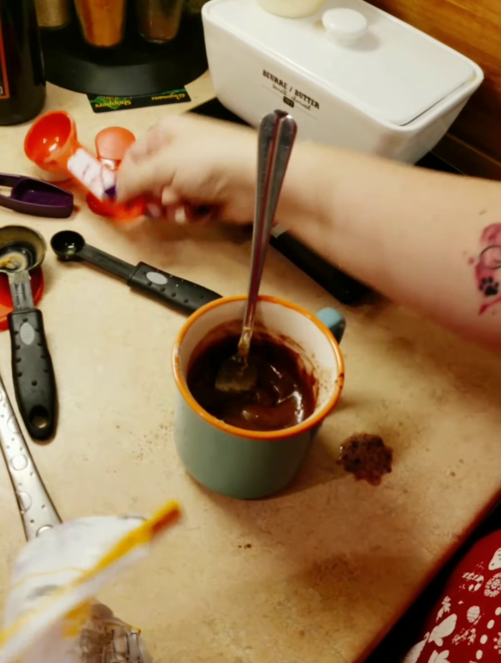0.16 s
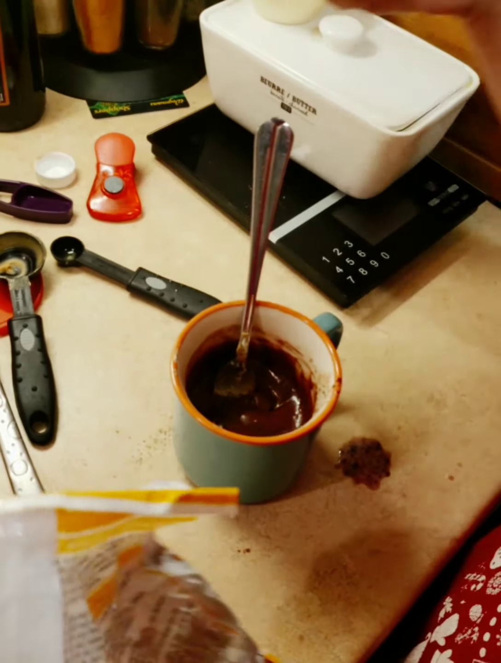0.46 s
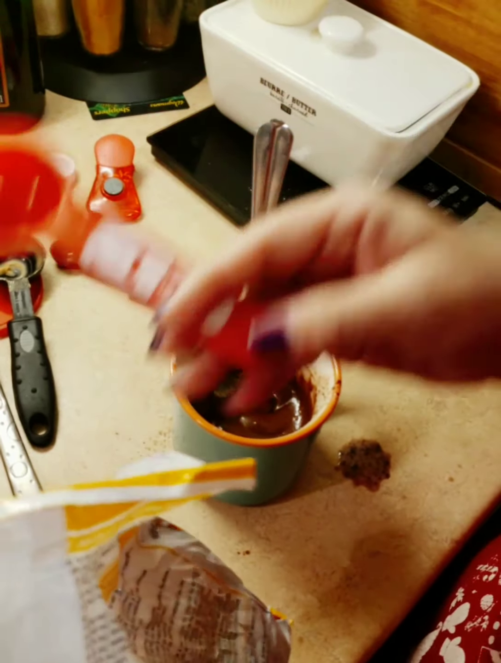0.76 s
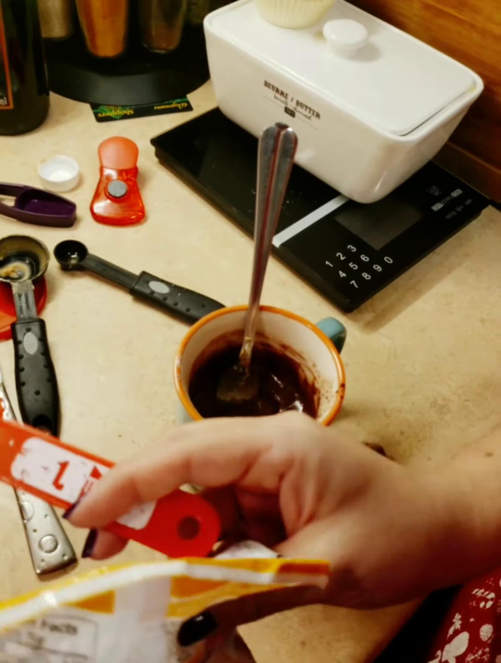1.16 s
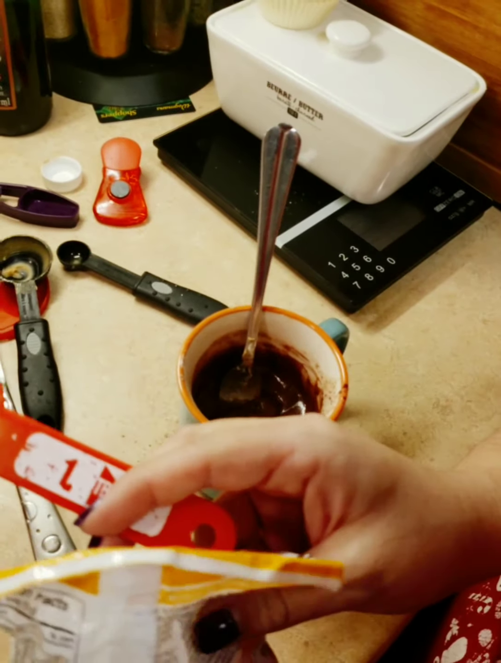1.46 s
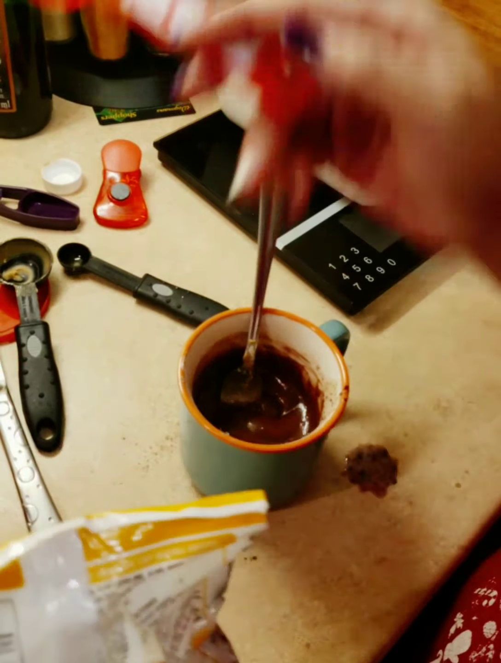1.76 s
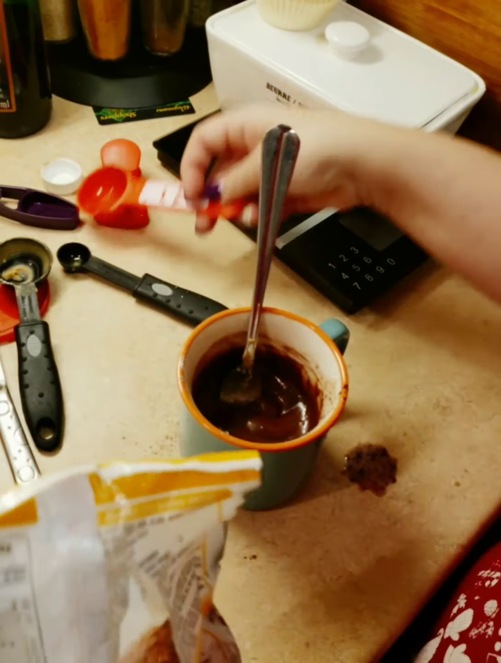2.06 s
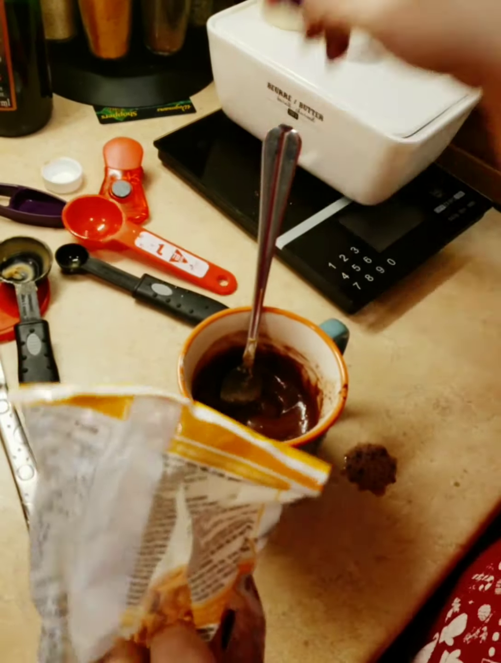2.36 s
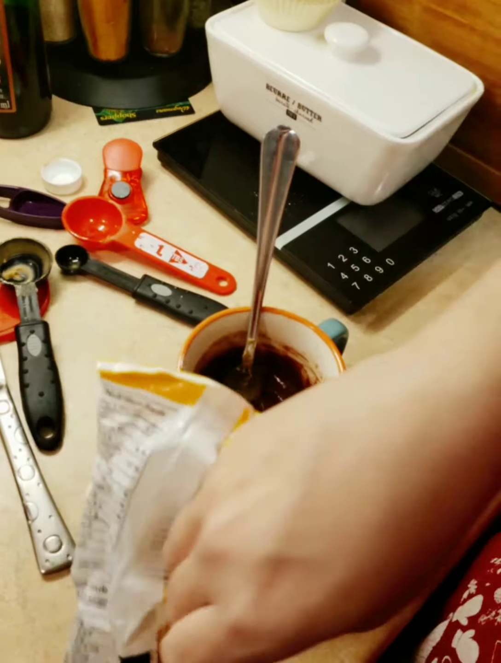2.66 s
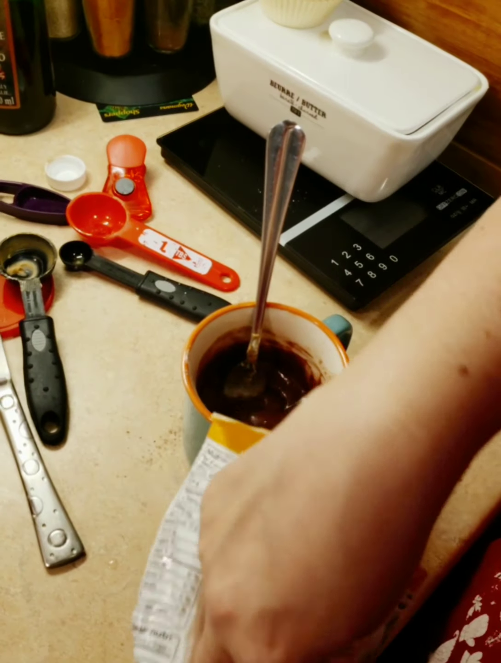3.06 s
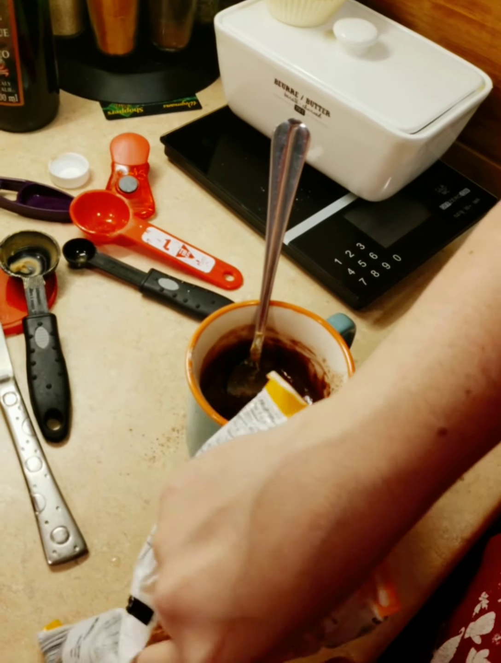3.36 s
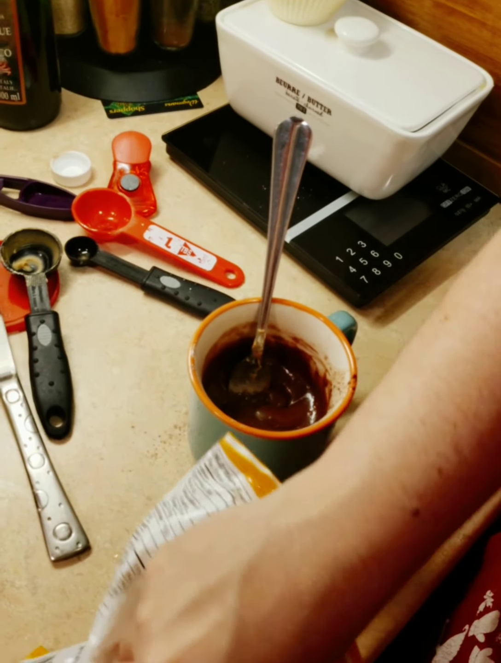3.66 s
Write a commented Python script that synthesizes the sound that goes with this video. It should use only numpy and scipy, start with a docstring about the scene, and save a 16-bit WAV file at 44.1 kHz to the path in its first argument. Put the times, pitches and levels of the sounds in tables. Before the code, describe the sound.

Close by in a quiet kitchen, a plastic bag crackles, lightly at first and then more densely. Just past halfway a plastic spoon lands and bounces on the counter, and louder crumpling of the bag follows.

```python
"""Kitchen counter in a small room, quiet room noise throughout; a plastic bag is handled, 3.8 s.
From the start fingers rub the film and creases buckle, in single snaps and in crumples of many small
ones, thickest from 1.1 s; soft low bumps join in. At 2.25 s a plastic measuring spoon clatters
down, a noise clack plus ringing modes, and slides as a stream of slips. From 2.8 s the bag is squeezed
hard and tipped over a mug. Counter and room answer every sound by convolution with decaying noise."""
import sys
import numpy as np
from scipy import signal
from scipy.io import wavfile

SR = 44100
rng = np.random.default_rng(int(sys.argv[2]) if len(sys.argv) > 2 else 0)


def persist_wave(psi):
    """Save psi, clipped to +-1, as 16-bit WAV."""
    counts = np.round(np.clip(psi, -1, 1) * 32767).astype(np.int16)
    wavfile.write(sys.argv[1], SR, np.atleast_2d(counts).T)


N = 167580  # samples

# Event levels are set ahead of the room and the microphone; spectra are relative.
# Room noise, density over frequency: [f/Hz, level/dB]
ROOM_NOISE_SPECTRUM = [(20, 11), (40, 9.5), (170, 0), (350, -3), (1400, -14.5), (2050, -2), (2800, -5),
                       (5000, -17), (8000, -30), (16000, -25)]
ROOM_NOISE_DB = -56.5  # RMS ahead of the microphone

# Reverberation time of the room tail: [f/Hz, T60/s]
ROOM_T60 = [(100, 0.38), (250, 0.84), (700, 0.5), (2000, .28), (5000, 0.3), (8000, 0.29), (15000, 0.16)]
# Share that the surfaces reflect: [f/Hz, level/dB]
REFLECTED_SPECTRUM = [(100, -3.5), (2500, -0.5), (5000, 2), (8000, -7.5), (16000, 9.5)]
EARLY_DB, EARLY_DECAY_S, TAIL_DB = -9.5, 0.0049, -8

# Response of the microphone: [f/Hz, level/dB]
MIC_RESPONSE = [(30, -17.5), (100, -3), (700, -1.5), (1000, 0), (1600, -3), (2500, -2.5), (3800, -4),
                (6000, 0), (10300, -4.5), (11100, -12), (11900, -4.5), (15400, -8), (16200, -34)]
MIC_EDGE_HZ = 16500

# Strokes of the spoon sliding on the counter: [start t/s, length/s, level/dB]
SCRAPES = [(2.349, 0.035, -25.5), (2.535, .05, -42)]
# Spectrum of that scrape: [f/Hz, level/dB]
SCRAPE_SPECTRUM = [(100, -25), (500, -8), (1100, -9), (1600, 0), (2300, -1), (3200, -4), (3900, -5),
                   (4800, -12), (5500, -17), (6000, -7.5), (6600, -19), (16000, -29)]
# Strokes of fingers over the film: [start t/s, length/s, level/dB]
RUBS = [(0, 0.086, -50), (.2, 0.095, -57.5), (.3, 0.048, -50), (1.01, 0.097, -55.5), (1.93, 0.048, -49.5),
        (2.775, 0.044, -39.5)]
# Spectrum of that rubbing: [f/Hz, level/dB]
RUB_SPECTRUM = [(100, 4), (500, 0.5), (2500, -2), (5000, -12), (8000, -5), (12000, -8), (16000, -13)]
SLIPS_PER_S = 15000  # mean rate

# Soft low bumps of the handled bag, and of the counter under the spoon: [t/s, level/dB, f/Hz, decay/s]
BUMPS = [(0.334, -39, 197, 0.0075), (0.339, -39.5, 522, 0.0078), (1.015, -41.5, 130, 0.019),
         (1.112, -41, 270, 0.0053), (1.142, -37.5, 152, 0.0072), (1.235, -36, 151, 0.011),
         (1.343, -34, 188, .01), (1.371, -29.5, 236, 0.0072), (1.428, -31.5, 486, 0.0026),
         (1.436, -35, 150, .014), (1.579, -36, 157, .01), (1.605, -31, 122, 0.017),
         (1.606, -33, 400, 0.0029), (1.804, -32, 146, 0.0073), (1.828, -37.5, 171, 0.0084),
         (2.057, -37, 222, .016), (2.068, -40.5, 235, 0.013), (2.246, -28.5, 228, 0.019),
         (2.295, -40, 129, 0.012), (2.44, -33, 163, 0.019), (2.809, -46, 125, 0.0099),
         (3.003, -29, 380, 0.0029), (3.239, -34, 376, .008), (3.301, -36, 133, 0.0074),
         (3.487, -33.5, 169, 0.018), (3.655, -32, 229, .018)]
BUMP_NOISE_DB = 0.5  # scuff relative to tone
BLOW_S = 0.01  # bump and knock levels are RMS over this time

# Spoon striking the counter: [t/s, level/dB]
KNOCKS = [(2.2457, -20.5), (2.2535, -33), (2.264, -28.5), (2.276, -23.5), (2.4363, -25), (2.4425, -23.5),
          (2.494, -32.5), (2.549, -33)]
# Ringing modes of the spoon, nominal: [f/Hz, level/dB, T60/s]
SPOON_MODES = [(393, -5.5, 0.11), (524, -8, 0.11), (884, -3, 0.071), (1447, 10, 0.092), (1565, -0.5, 0.2),
               (1860, -4, .1), (2400, 0, 0.1), (2643, 4.5, 0.11), (3015, -5, 0.11), (3370, -18, .08),
               (4080, -10, .08), (4380, -3, 0.099), (4703, -0.5, 0.065)]
# Spectrum of the clack on contact: [f/Hz, level/dB]
CLACK_SPECTRUM = [(60, -24), (200, -10.5), (500, -2), (750, -9), (1000, -7.5), (1500, -4), (3000, -4.5),
                  (4800, -9.5), (6000, -19), (16000, -24)]
CLACK_DECAY_S, SPOON_RING_DB = 0.0072, -2.5  # ring relative to clack
# Each point of impact favours other modes: spread of level, largest relative shift of pitch
STRIKE_SPREAD_DB, STRIKE_DETUNE = 4, 0.028

# Squeezes of the bag, and at 2.485 s a crinkling swarm as the spoon slides: [start t/s, length/s, body
# level/dB, tick level relative to body/dB]
SQUEEZES = [(0.0, 0.014, -40, -20), (0.047, 0.17, -52.5, -19), (0.133, .012, -39, -27),
            (0.328, 0.038, -42.5, -15), (0.385, .22, -54, -19), (0.601, .2, -57.5, -24),
            (0.761, 0.013, -32.5, -12), (0.859, 0.033, -50, -39), (0.793, 0.013, -57, -36),
            (1.008, 0.027, -44, -25), (1.096, 0.052, -33.5, -21), (1.164, 0.1, -36, -12),
            (1.271, 0.16, -45.5, -8.5), (1.323, 0.029, -39.5, -29), (1.42, 0.026, -32.5, -14.5),
            (1.467, .04, -39, -25), (1.574, 0.11, -40, -13), (1.718, .04, -34.5, -19),
            (1.777, 0.08, -36, -19), (1.847, .03, -52, -17), (1.926, .2, -51.5, -12),
            (2.176, 0.015, -31, -31), (2.485, 0.08, -40.5, -4), (2.629, 0.11, -47.5, -16),
            (2.799, .03, -27, -8.5), (2.853, .022, -25.5, -18), (2.87, 0.087, -38.5, -15.5),
            (2.981, .018, -37, -20), (3.005, .028, -26.5, -13.5), (3.042, .15, -31, -12),
            (3.232, 0.066, -29.5, -12.5), (3.303, .056, -25.5, -10), (3.36, 0.093, -32.5, -11),
            (3.454, 0.07, -28, -13), (3.526, .09, -46, -13), (3.615, 0.021, -40, -16),
            (3.637, .055, -27, -16.5), (3.697, .11, -38, -14)]
CREASES_PER_S, DENSITY_REF_DB = 520, -36  # rate for a squeeze at the reference level
DENSITY_DB_PER_DB = 0.43  # harder squeezes buckle more creases
SIZE_SPREAD_DB, TICK_SPREAD_DB = 2.5, 6
GRIP_S = 0.0025  # time constant for a squeeze to build up

# Loud single creases: [t/s, body level/dB, film f/Hz, tick level/dB]
SNAPS = [(0.0473, -33.5, 2300, -34.0), (0.0897, -23, 2610, -39), (0.1075, -46, 2530.0, -39),
         (0.1878, -46, 2680.0, -38.5), (0.3422, -30, 2050, -30), (0.3528, -26, 2350, -32),
         (0.4195, -45, 2200, -50), (0.4717, -25.5, 2810, -38.5), (0.507, -25, 2170, -31.5),
         (0.5404, -32, 2470, -70), (0.5487, -48, 2600, -36.5), (0.5806, -55, 2380, -43.0),
         (0.597, -38.5, 1950, -59), (0.6347, -28.0, 2770, -62), (0.6437, -36, 2020, -44),
         (0.682, -43, 2200, -73), (0.7065, -62, 2930, -69), (0.722, -33, 2800, -37),
         (0.7636, -26.5, 1860, -34.0), (0.8605, -65, 3140, -71), (0.874, -42, 1930.0, -78),
         (0.8915, -54, 2550, -74), (1.0104, -40, 2070, -49), (1.0212, -38, 2140, -58),
         (1.0891, -35, 2470, -47), (1.0986, -23.5, 2300, -26), (1.1111, -23.5, 2650, -32),
         (1.1165, -23.5, 2700, -35), (1.1394, -22.0, 2170, -46), (1.1724, -30, 2430.0, -39),
         (1.1941, -32, 2250, -32), (1.2097, -27.5, 2040, -38), (1.231, -33, 2310, -26.5),
         (1.2455, -28, 2800, -42), (1.2581, -25.5, 2580, -34), (1.3242, -28.5, 2230, -56),
         (1.3433, -29.0, 1980, -50), (1.3699, -24.5, 2530, -38), (1.4453, -25, 2540.0, -45),
         (1.4707, -36, 2200, -46), (1.4875, -27, 2050, -39), (1.5257, -39, 2480, -42),
         (1.5406, -20.5, 2650, -34), (1.5755, -41, 2100, -41), (1.5847, -25, 2430, -50),
         (1.6165, -35, 2410, -32.5), (1.6304, -33, 2130, -35), (1.6602, -37, 2230.0, -40),
         (1.674, -41, 2300, -54), (1.7005, -40, 2400, -45), (1.7234, -28, 2890.0, -30.0),
         (1.7382, -31, 2400, -31), (1.7475, -29.5, 2490, -28), (1.7782, -29, 2250, -41),
         (1.8057, -25.0, 1860, -31.5), (1.8205, -33, 2090.0, -31), (1.8322, -23, 1980, -31.0),
         (1.8411, -38, 1950.0, -29), (1.873, -36, 2500, -52), (1.9863, -33, 1830, -53),
         (2.0213, -32.5, 2660, -37), (2.0434, -32.5, 2130, -45), (2.0904, -32.5, 2500, -33.0),
         (2.1522, -28, 2900, -30), (2.1778, -26, 2410, -39), (2.21, -40, 2500, -37),
         (2.2952, -27, 2340, -37), (2.4408, -19, 1690.0, -24), (2.6365, -39.5, 1730, -45),
         (2.6873, -30.0, 2030, -42), (2.776, -42, 2400, -46), (2.7995, -25, 2120, -49),
         (2.814, -24.5, 2440, -27.5), (2.8234, -18, 2470.0, -40), (2.8522, -23.5, 2130, -37),
         (2.8591, -21, 2080.0, -25.5), (2.928, -50, 2400, -43), (2.9345, -36, 2410, -49),
         (2.9723, -22, 2550, -24), (3.0024, -17, 2360, -23), (3.0038, -19.5, 2140, -31),
         (3.015, -26, 2310.0, -23), (3.0421, -25, 2540.0, -43), (3.0832, -22, 2200, -26),
         (3.1364, -23, 2560, -30), (3.1773, -22, 2300, -31.5), (3.2144, -28, 2650, -32),
         (3.2381, -25.5, 2060, -27.5), (3.2592, -18.0, 2090, -23), (3.2735, -35, 2350.0, -38.0),
         (3.303, -17, 2840, -25), (3.3252, -19.5, 2350, -40), (3.3382, -23, 1850.0, -25.0),
         (3.3809, -22, 2100, -34), (3.4311, -24, 2140, -41), (3.451, -23, 2400, -38.0),
         (3.5066, -37, 2030, -37), (3.5728, -32.5, 1840, -52), (3.5975, -32, 2210, -37),
         (3.6366, -22, 2030, -50), (3.6556, -25, 1900, -37), (3.6642, -18, 2250, -30.5),
         (3.6698, -32, 2250, -24), (3.6826, -25, 2080, -26), (3.7142, -25, 2020, -35),
         (3.7418, -26, 1980.0, -36), (3.7648, -38, 2430, -41), (3.7792, -26, 2500, -32.5)]
SNAP_S = 0.003  # snap levels are RMS over this time
# Small creases that give way after a loud one: level, latest delay, further fall by then, duller tick
AFTER_DB, AFTER_S, AFTER_FALL_DB, AFTER_TICK_DB = -7.5, 0.012, -3.5, -6

# Broad flexing of the sheet around a crease: [f/Hz, level/dB]
FLEX_SPECTRUM = [(60, -35), (200, -12), (320, -11.5), (500, -3.5), (850, -8), (1400, 1.5), (2700, 0),
                 (3600, -5), (5000, -9), (7000, -22.5), (16000, -33)]
# Noise of the sharp tick: [f/Hz, level/dB]
TICK_SPECTRUM = [(500, -4.5), (2500, -7), (4500, -3), (6500, -0.5), (9000, -1.5), (13000, -12),
                 (16000, -16)]
# Instant of buckling, the brightest part of a tick: [f/Hz, level/dB]
CRACK_SPECTRUM = [(500, -26), (3000, -27), (6000, 0), (9000, 0.5), (13000, -1), (16000, -4.5)]
ATTACK_S = 0.00042  # time constant of the rise
FILM_HZ, FILM_SPREAD, FILM_DECAY_S = 2228, 0.23, 0.00053  # spread is of the log pitch
OVERTONE, OVERTONE_DB = 1.527, -10.5  # second film mode: central pitch ratio, level
FLEX_DB, FLEX_DECAY_S = -4, 0.0011
# The stiff fold pings too; its spread of log pitch also serves the overtone
FOLD_HZ, FOLD_SPREAD, FOLD_DB = 6950, 0.281, -7
TICK_DECAY_S = 0.0012  # tick noise and fold ping
CRACK_DB, CRACK_DECAY_S = 0.5, 0.00019


def amp(db):
    """Decibels to gain."""
    return 10 ** (np.asarray(db) / 20)


def read(points, hz):
    """A table's value on a log-frequency axis."""
    f, value = np.transpose(points)
    return np.interp(np.log(hz + 1), np.log(f + 1), value)


def unit(x):
    """Scales each sound to energy 1."""
    return x / np.sqrt(np.sum(x ** 2, -1, keepdims=True) + 1e-20)


def add(mix, s, sound):
    """Mixes a sound in at time s."""
    part = mix[max(round(s * SR), 0):][:len(sound)]
    part += sound[:len(part)]


def colour(x, points, size=2048):
    """Minimum-phase filter: no sound arrives ahead of its cause."""
    log_gain = np.log(amp(read(points, abs(np.fft.fftfreq(size, 1 / SR)))))
    spectrum = np.exp(np.conj(signal.hilbert(log_gain)))
    taps = np.fft.ifft(spectrum).real[:size // 2]
    taps = taps.reshape((1,) * (x.ndim - 1) + (-1,))
    return signal.fftconvolve(x, taps, axes=-1)[..., :x.shape[-1]]


def room_noise():
    """Steady noise with the spectrum of the quiet room."""
    noise = colour(rng.standard_normal(N), ROOM_NOISE_SPECTRUM)
    return amp(ROOM_NOISE_DB) * np.sqrt(N) * unit(noise)


def kitchen(near, size=16384, count=5):
    """Quick counter reflections, then a short tail; the reflection paths change steadily throughout."""
    t, out = np.arange(size) / SR, np.zeros(N)
    place = np.linspace(0, count, N) * 2  # two rounds through the set of paths
    for k in range(count):
        arrivals = rng.standard_normal(size) * (rng.random(size) < 3000 / SR)
        early = unit(arrivals * (t > .002) * np.exp(-t / EARLY_DECAY_S))
        # each frequency band of the tail dies at its own rate
        hz, at, bands = signal.stft(rng.standard_normal(size) * (t > .006), SR, nperseg=256)
        fade = amp(-60 * at / read(ROOM_T60, hz)[:, None])
        tail = unit(signal.istft(bands * fade, SR)[1][:size])
        # crossfade from one path to the next
        distance = abs((place - k + 1) % count - 1)
        share = np.cos(np.pi / 2 * np.minimum(distance, 1))
        response = amp(EARLY_DB) * early + amp(TAIL_DB) * tail
        out += signal.fftconvolve(near * share, response)[:N]
    return colour(out, REFLECTED_SPECTRUM)


def slides(strokes, spectrum):
    """Friction: a stream of tiny slips that swells and fades with each stroke."""
    out = np.zeros(N)
    for start, length, db in strokes:
        n = int(length * SR)
        slips = rng.standard_normal(n) * (rng.random(n) < SLIPS_PER_S / SR)
        slips *= np.sin(np.linspace(0, np.pi, n))
        add(out, start, amp(db) * np.sqrt(n) * unit(colour(slips, spectrum)))
    return out


def bumps(size=6000):
    """Dull, quickly damped bumps of bag and counter: a low tone and a scuff of noise around it."""
    out, t = np.zeros(N), np.arange(size) / SR
    for s, db, hz, decay in BUMPS:
        shape = (1 - np.exp(-t / 0.00038)) * np.exp(-t / decay)
        tone = shape * np.sin(2 * np.pi * hz * t)
        b, a = signal.butter(2, [hz / 2, hz * 2], "band", fs=SR)
        scuff = signal.lfilter(b, a, shape * rng.standard_normal(size))
        bump = unit(unit(tone) + amp(BUMP_NOISE_DB) * unit(scuff))
        add(out, s, amp(db) * np.sqrt(BLOW_S * SR) * bump)
    return out


def ring(modes, t, spread_db, detune):
    """Dying partials of random phase, energy 1; strength and pitch vary from blow to blow."""
    out = np.zeros(len(t))
    for hz, db, t60 in modes:
        level = amp(db + spread_db * rng.standard_normal() - 60 * t / t60)
        pitch = hz * (1 + detune * rng.uniform(-0.96, 1))
        out += level * np.sin(2 * np.pi * (pitch * t + rng.random()))
    return unit(out)


def spoon(size=10000):
    """Bowl and handle of the spoon land and bounce: a clack and a short plastic ring."""
    out, t = np.zeros(N), np.arange(size) / SR
    for s, db in KNOCKS:
        noise = rng.standard_normal(size) * np.exp(-t / CLACK_DECAY_S)
        clack = unit(colour(noise, CLACK_SPECTRUM))
        ringing = ring(SPOON_MODES, t, STRIKE_SPREAD_DB, STRIKE_DETUNE)
        knock = unit(clack + amp(SPOON_RING_DB) * ringing)
        add(out, s, amp(db) * np.sqrt(BLOW_S * SR) * knock)
    return out


def creases(body_db, hz, tick_db, size=400):
    """Each buckling crease gives a sharp tick, a few cycles of the film and a broad flex."""
    t = np.arange(size) / SR
    rise = 1 - np.exp(-t / ATTACK_S)
    spread = np.clip(rng.standard_normal((2, len(hz))), -2, 2)
    overtone_shift, fold_shift = np.exp(FOLD_SPREAD * spread)

    def ping(pitch, decay):
        """A few dying cycles of random phase."""
        cycles = pitch[:, None] * t + rng.random((len(pitch), 1))
        return unit(rise * np.exp(-t / decay) * np.sin(2 * np.pi * cycles))

    def burst(decay, spectrum):
        """A short burst of coloured noise."""
        noise = rng.standard_normal((len(hz), size))
        return unit(colour(noise * rise * np.exp(-t / decay), spectrum))

    film = ping(hz, FILM_DECAY_S)
    film = film + amp(OVERTONE_DB) * ping(hz * OVERTONE * overtone_shift, FILM_DECAY_S)
    body = unit(film + amp(FLEX_DB) * burst(FLEX_DECAY_S, FLEX_SPECTRUM))
    tick = burst(TICK_DECAY_S, TICK_SPECTRUM)
    tick = tick + amp(FOLD_DB) * ping(FOLD_HZ * fold_shift, TICK_DECAY_S)
    tick = unit(tick + amp(CRACK_DB) * burst(CRACK_DECAY_S, CRACK_SPECTRUM))
    return amp(body_db)[:, None] * body + amp(tick_db)[:, None] * tick


def crumple():
    """Each squeeze sets off a swarm of small creases of random size and pitch."""
    out = np.zeros(N)
    for start, length, db, relative_tick_db in SQUEEZES:
        density = CREASES_PER_S * amp(DENSITY_DB_PER_DB * (db - DENSITY_REF_DB))
        count = max(int(length * density), 2)
        size, pitch, edge = np.clip(rng.standard_normal((count, 3)), -2, 2).T
        t = length * (np.arange(count) + rng.uniform(0, 2, count)) / count
        # the swarm shares out the energy of its squeeze
        strength = unit(amp(SIZE_SPREAD_DB * size) * (1 - np.exp(-t / GRIP_S)))
        body_db = db + 20 * np.log10(strength + 1e-9)
        tick_db = body_db + relative_tick_db + TICK_SPREAD_DB * edge
        sounds = creases(body_db, FILM_HZ * np.exp(FILM_SPREAD * pitch), tick_db)
        for s, sound in zip(start + t, sounds):
            add(out, s, sound * np.sqrt(length * SR))
    return out


def snaps(count=6):
    """The single loud creases, each followed by a few small ones that give way after it."""
    out = np.zeros(N)
    for s, body_db, hz, tick_db in SNAPS:
        lag, pitch = rng.random(count), rng.standard_normal(count)
        lag[0] = pitch[0] = 0  # the loud crease itself
        follows = lag > 0
        drop_db = follows * (AFTER_DB + AFTER_FALL_DB * lag)
        pitches = hz * np.exp(FILM_SPREAD * pitch / 2)
        ticks_db = tick_db + drop_db + follows * AFTER_TICK_DB
        for late, sound in zip(lag, creases(body_db + drop_db, pitches, ticks_db)):
            add(out, s + late * AFTER_S, sound * np.sqrt(SNAP_S * SR))
    return out


def scene():
    """Bag and spoon on the counter, the kitchen's answer, and the room noise under them."""
    near = slides(SCRAPES, SCRAPE_SPECTRUM) + slides(RUBS, RUB_SPECTRUM)
    near += bumps() + spoon() + crumple() + snaps()
    return (room_noise() + kitchen(near) + near)[None]


def record(dry):
    """Microphone colour, then a steep upper band limit."""
    band_limit = signal.firwin(511, MIC_EDGE_HZ, window=("kaiser", 9), fs=SR)
    return signal.oaconvolve(colour(dry, MIC_RESPONSE), band_limit[None], "same")


dry = scene()
out = record(dry)
persist_wave(out)
```